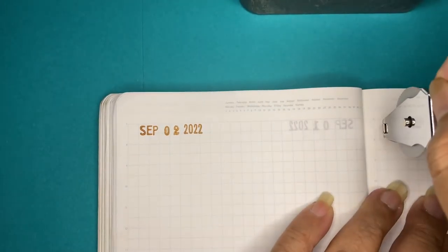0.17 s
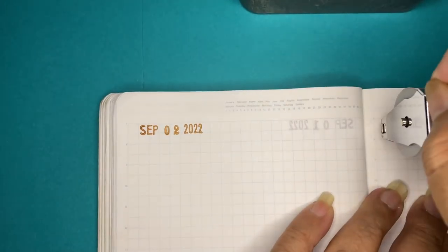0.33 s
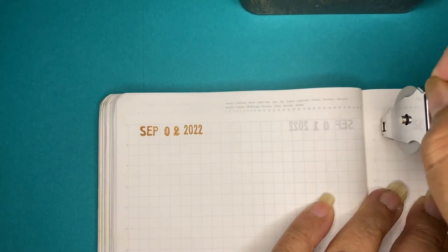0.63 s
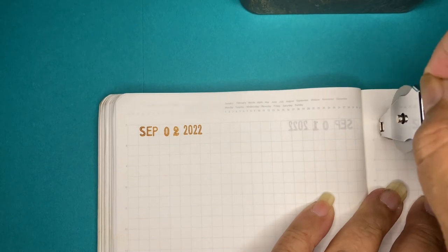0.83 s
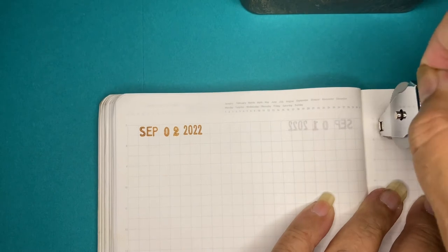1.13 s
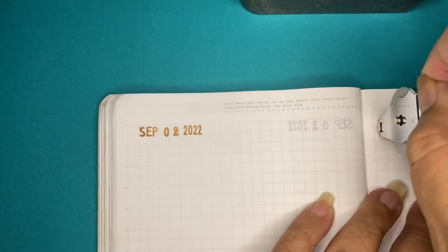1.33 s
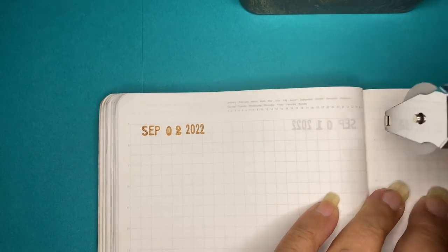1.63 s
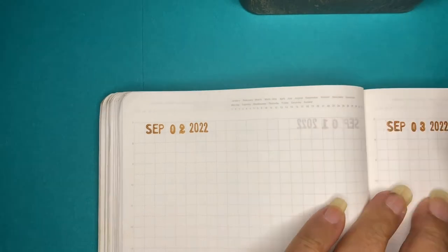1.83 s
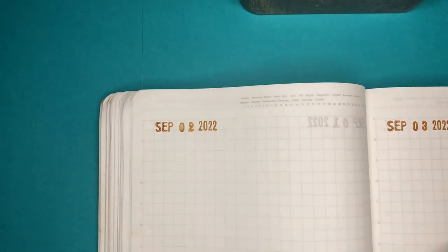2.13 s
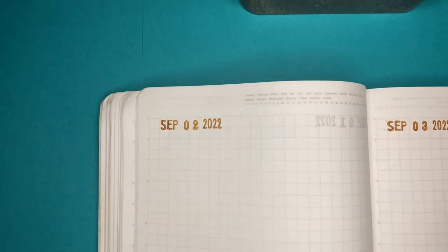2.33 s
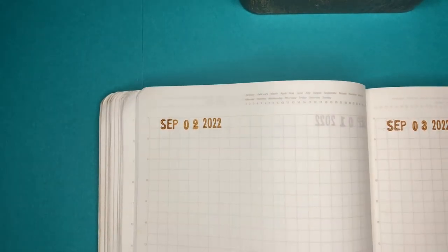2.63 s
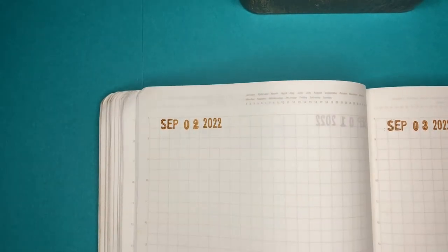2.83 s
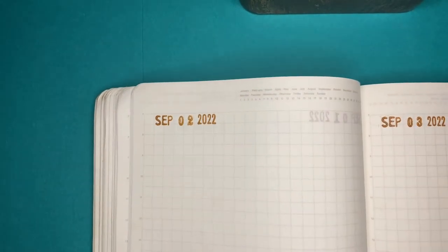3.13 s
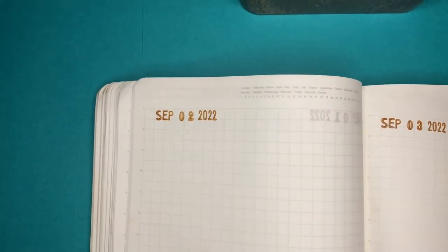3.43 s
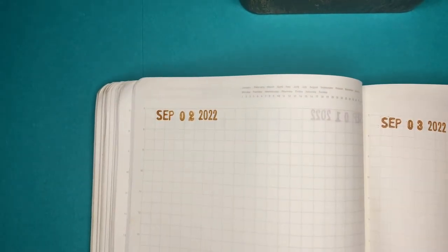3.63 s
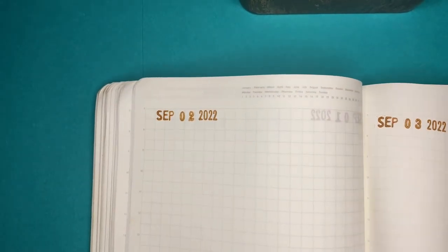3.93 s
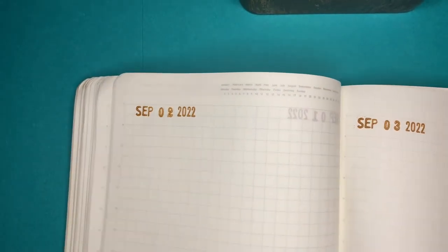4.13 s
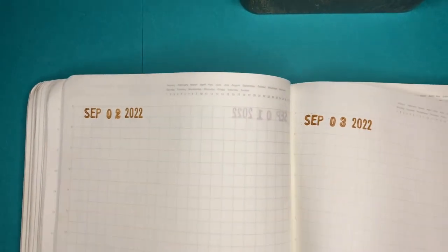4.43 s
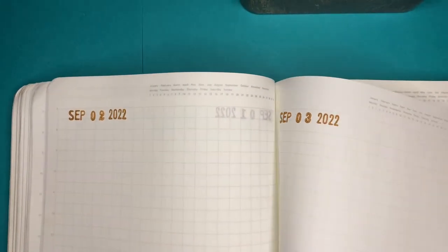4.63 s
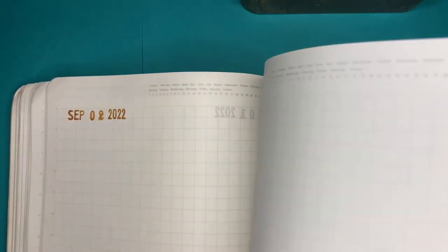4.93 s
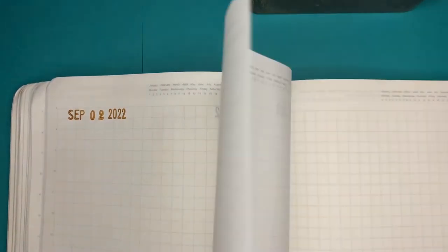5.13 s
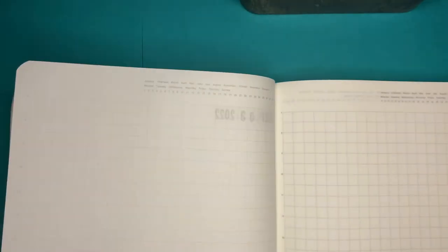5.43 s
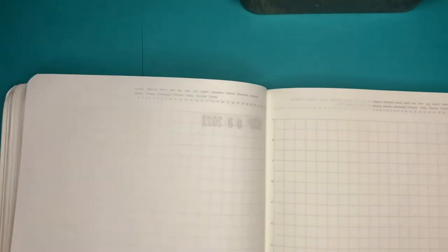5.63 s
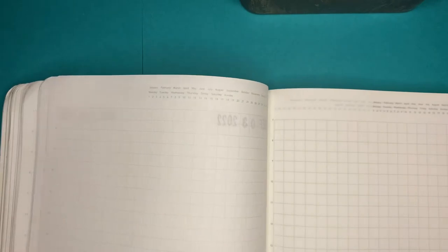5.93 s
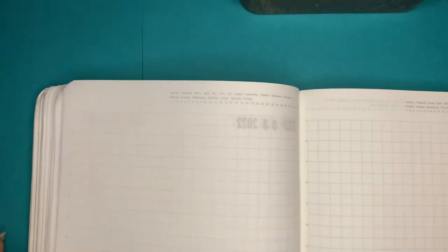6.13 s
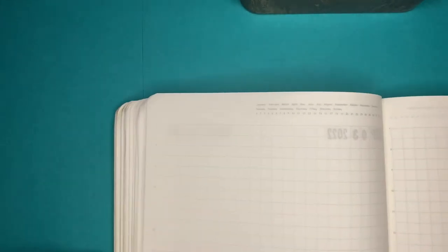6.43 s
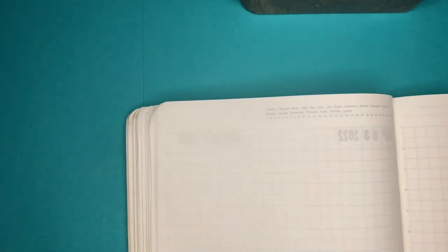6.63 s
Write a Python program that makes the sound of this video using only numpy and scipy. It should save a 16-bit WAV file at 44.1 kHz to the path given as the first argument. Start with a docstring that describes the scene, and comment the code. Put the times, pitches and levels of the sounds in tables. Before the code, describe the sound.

Close above a desk in a quiet room with low ventilation hum, a small metal stamp lifts off paper with light clicks and is put aside with faint tinkles. A soft thump follows, then a finger stutters along paper with crisp crinkles. After gentle brushing, a page snaps free loudly, flaps over and settles, and the book is pushed across a mat with a muted scrape.

```python
"""A quiet room hums; then a metal date stamp is lifted off a notebook and put aside, clicking and tinkling.
A finger slides along the paper in jerks, a page snaps free and flaps over, the book is pushed over the mat.
Contacts are bursts of grit through resonances, friction is shaped noise with gliding rings,
the room is noise, drones and sines. Two closely spaced microphones hang just above the desk."""
import sys
import numpy as np
from scipy import signal
from scipy.fft import rfft, irfft, next_fast_len
from scipy.io import wavfile

SR = 44100
rng = np.random.default_rng(int(sys.argv[2]) if len(sys.argv) > 2 else 0)


def unload_audio(sound):
    """Save the sound as a 16-bit wav file, at the path given as the first command line argument."""
    columns = np.transpose(np.atleast_2d(sound))
    # keep every value between -1 and 1, then stretch to whole-number steps
    steps = np.round(np.clip(columns, -1, 1) * 32767)
    wavfile.write(sys.argv[1], SR, steps.astype(np.int16))


N = 298557
TIME = np.arange(N) / SR
PADDED = next_fast_len(N + SR // 4, True)
FREQ = np.arange(PADDED // 2 + 1) * SR / PADDED
LEFT_RIGHT = np.array([[.5], [-.5]])  # splits a left-minus-right difference over the channels
CREST_S = 1 / 50  # position of the crest within each burst
CUTOFF_HZ = 15900

# bent sheet buckling and fluttering: (time [s], level [dB], decay [s], pitch ratio, belly [dB re sheet gain])
FLAPS = [(4.566, -29, 0.0043, 0.84, -3), (4.572, -37.5, 0.004, 1.02, -3), (4.581, -40.5, 0.0025, 1.08, -1),
         (5.1906, -21.5, 0.0017, 1.05, -12), (5.1934, -23.5, 0.0046, 1, -12), (5.202, -30, .002, 0.87, -1),
         (5.2078, -39, .002, 1.02, -3), (5.2118, -30.5, .0025, 0.99, 2), (5.2194, -21, 0.0011, 0.937, -3),
         (5.2221, -26, 0.003, 1, -6), (5.2292, -32, 0.0046, 0.95, -13), (5.239, -38, 0.0069, .97, 1),
         (5.2685, -34.5, 0.0031, 0.96, -8)]
# ring of the released page: (frequency [Hz], width [Hz], gain [dB])
SNAP_MODES = [(1310, 300, 0.5), (1780, 440, -2.5), (2620, 370, -10), (3040, 160, -14), (3400, 170, -11),
              (4660, 140, -6), (5130, 220, -10.5), (5520, 310, -8), (6270, 340, -7.5), (9440, 690, -15.5),
              (10700, 710, -16.5), (12500, 1300, -21), (15500, 900, -29)]
# sheet resonances at pitch ratio 1: (frequency [Hz], width [Hz], gain [dB])
SHEET_MODES = [(1765, 160, -1.5), (2060, 220, 4.5), (2540, 440, 0), (3750, 430, -9), (4750, 1470, -13.5)]
# page lifted, swung over, slid flat; levels before trim:
# (time [s], ring [dB], resonance [Hz], hiss [dB])
PAGE_SWEEP = [(4.8, -78, 2987, -75), (4.885, -68, 4314, -70), (4.96, -77, 4020, -76),
              (5.06, -63, 3600, -71), (5.115, -65, 3520, -58.5), (5.15, -56.5, 2303, -56),
              (5.185, -54, 2700, -60), (5.218, -42.5, 3907, -72), (5.248, -55, 4400, -76),
              (5.275, -76, 2600, -86), (5.3, -80, 2594, -87), (5.47, -73, 3800, -76),
              (5.55, -71, 4130, -76), (5.625, -56, 4007, -72), (5.68, -76, 4290, -69)]
# finger slipping along the page; level before trim: (time [s], length [s], level [dB])
SLIPS = [(3.253, 0.028, -37), (3.271, 0.032, -40.5), (3.301, 0.024, -43.5), (3.329, 0.0046, -39.5),
         (3.347, 0.0064, -38.5), (3.363, 0.0054, -37.5), (3.372, 0.0095, -40.5), (3.384, 0.025, -40.5),
         (3.412, 0.0088, -40.5), (3.432, 0.0071, -38), (3.459, 0.0077, -42), (3.482, 0.0086, -43),
         (3.5, 0.034, -46.5), (3.534, 0.025, -52.5), (3.583, 0.035, -54), (3.617, 0.0099, -39.5),
         (3.632, 0.015, -49.5)]
# kinks in the paper: (time [s], level [dB], resonance [Hz])
CRINKLES = [(2.6756, -45, 1710), (2.6804, -37.5, 1900), (2.809, -61.5, 4470), (3.261, -31, 4600),
            (3.293, -38, 4400), (3.3007, -32, 3800), (3.4635, -42, 3500), (3.483, -34, 3000),
            (3.4885, -45, 5000), (3.504, -35, 3080), (3.511, -31, 2900), (3.528, -42, 2900),
            (3.5545, -43.5, 4400), (3.616, -35.5, 2593), (3.623, -39, 1906), (3.638, -39, 1600),
            (3.7335, -45.5, 3230), (4.2107, -47, 2800), (4.661, -46.5, 1400), (4.756, -47, 1580),
            (4.8512, -41, 1500), (4.852, -53, 4600), (4.8645, -52, 1700), (4.885, -56, 4500),
            (4.912, -51, 3600), (4.937, -55.5, 3980), (5.037, -55, 3000), (5.143, -45, 2300),
            (5.183, -37, 5230), (5.186, -34, 4800), (5.366, -56, 3900), (5.406, -47.5, 2040),
            (5.534, -49, 2100), (5.58, -48, 1790), (5.6458, -38, 3900), (5.6472, -39, 2950),
            (5.6493, -37, 3970), (5.652, -45, 3700), (5.763, -52, 3230)]
# short-lived high modes that make a paper kink crisp: (frequency [Hz], width [Hz], gain [dB])
KINK_EDGE_MODES = [(6060, 2500, -3), (9900, 4500, 2), (15000, 2700, -4)]
# soft knocks of hand, stamp and page on the book: (time [s], level [dB], resonance [Hz])
KNOCKS = [(2.0175, -42, 610), (2.676, -43, 460), (2.686, -44.5, 380), (3.395, -43, 745), (3.433, -49, 700),
          (3.483, -46, 950), (3.504, -44, 1100), (3.589, -36.5, 640), (4.565, -44, 480), (4.5665, -45, 223),
          (4.851, -49, 800), (5.19, -37.5, 430), (5.204, -38, 320), (5.211, -37, 61.6), (5.2195, -40, 620),
          (5.220, -36, 166), (5.228, -38.5, 150), (5.646, -42, 744)]
# stamp touching paper and desk:
# (time [s], level [dB], resonance [Hz], crisp edge [dB re click], thud [dB re click])
STAMP_CLICKS = [(1.466, -55, 2900, -9, -12), (1.4755, -46, 2200, -22, -10), (1.5503, -41.5, 2350, -8, -9),
                (1.5693, -46, 2500, 1, -4), (1.5711, -48.5, 1200, -12, -4.5), (1.628, -66, 3500, -4, -8),
                (1.7002, -45.5, 2060, -9, -5.5), (1.8035, -52, 2300, -15, -15), (1.8635, -53, 2400, -8, -4),
                (1.9185, -56.5, 1900, 8.5, 0), (1.9365, -48.5, 2200, 3.5, -4),
                (1.9425, -48.5, 2000, -9, -4), (1.976, -62, 3000, 5, -6), (1.993, -48, 2500, 2, -6),
                (2.0182, -48.5, 1400, 10, -5), (2.025, -53, 1900, 3, 0), (2.056, -55, 3500, -2, -6),
                (2.373, -64, 4000, 0, -3), (2.397, -63, 2200, 3, -6), (2.4905, -51, 5530, -12, -3),
                (2.4978, -43, 2460, -6, -4)]
# loose metal rattling in the stamp; level before trim: (time [s], level [dB])
TINKLES = [(2.19, -60), (2.265, -54), (2.446, -49), (2.526, -51), (2.584, -53)]
# stamp modes: (frequency [Hz], width [Hz], gain [dB])
STAMP_MODES = [(1240, 22, -5), (1420, 18, -8), (1712, 22, 3.5), (2280, 30, -5), (2700, 70, -9),
               (3390, 32, -12), (3597, 36, -7), (3680, 32, -6.5), (4128, 36, -9.5), (4310, 28, -8),
               (4700, 38, -12), (5060, 36, -16)]
# short-lived high modes that make a stamp click crisp: (frequency [Hz], width [Hz], gain [dB])
STAMP_EDGE_MODES = [(5640, 1600, 3.5), (9300, 3200, -0.5), (12500, 2200, -0.5), (15400, 2200, -5)]
# paper and hand sliding softly; hiss before trim: (start [s], length [s], rub [dB], hiss [dB])
SLIDES = [(1.46, 0.8, -70, -83), (1.464, 0.016, -61, -75), (1.975, 0.047, -65, -65),
          (2.03, 0.035, -62.5, -76), (2.058, 0.043, -63, -67), (2.444, 0.22, -65, -78),
          (2.639, 0.049, -56.5, -61.5), (2.802, 0.015, -60, -67), (2.976, 0.052, -56.5, -60),
          (3.154, 0.14, -65, -74), (3.338, 0.12, -60.5, -63), (3.538, 0.099, -56.5, -58),
          (3.667, 0.25, -67, -70), (3.73, 0.021, -60.5, -58), (3.817, 0.018, -59.5, -62),
          (3.985, 0.28, -67, -69), (4.072, 0.11, -52, -59.5), (4.298, 0.2, -61.5, -69),
          (4.81, 0.49, -66, -78), (4.849, 0.032, -60, -67), (5.376, 0.041, -57.5, -67.5),
          (5.468, 0.11, -58, -75), (5.618, 0.039, -58.5, -62), (5.692, 0.014, -66, -60),
          (5.854, 0.083, -70, -71)]
# book pushed across the mat; levels before trim: (time [s], rub [dB], hiss [dB])
BOOK_PUSH = [(5.9, -71, -75), (6.014, -55.5, -56), (6.054, -57.5, -69.5), (6.192, -53, -66),
             (6.428, -55, -66.5), (6.482, -65, -81), (6.582, -71, -87), (6.654, -68, -76), (6.76, -79, -99)]
# mains hum and faint motor whine: (frequency [Hz], level before balance [dB])
HUM = [(120, -59.5), (179.3, -63.5), (398.9, -71), (607.2, -73.5), (960.4, -76), (1011.5, -94),
       (1061.8, -74)]
# low room modes stirred by distant machinery: (frequency [Hz], nominal width [Hz], level before balance [dB])
DRONE = [(52.5, 5.1, -56.5), (65.1, 4.6, -56.5), (117.35, 6.6, -59.5), (190.8, 10.7, -66.5)]
# relative spectra of ventilation, finger friction, dull rub, fine hiss: (frequency [Hz], density [dB per Hz])
AIR_SPECTRUM = [(25, -20), (45, -9), (90, -4.5), (190, -4.5), (270, -5), (330, -10.5), (400, -7.5),
                (520, -17), (950, -16), (1500, -23.5), (2400, -24.5), (4000, -34.5), (6000, -45),
                (8500, -51), (15000, -67)]
SWISH_SPECTRUM = [(300, -7), (950, -11), (1600, -18), (2800, -3), (4200, 2), (5300, -3.5), (8000, -3.5),
                  (11500, -5), (13500, -12), (15500, -23)]
RUB_SPECTRUM = [(200, -1), (450, -7.5), (700, 5.5), (1400, 0), (2300, -4), (3500, -7.5), (6000, -11.5),
                (9000, -62)]
HISS_SPECTRUM = [(1500, 0), (4000, 3.5), (6000, 0.5), (8000, 4), (11500, -0.5), (13500, -0.5), (15500, -6)]
# phase difference between the channels: (frequency [Hz], lead of left [rad])
CHANNEL_PHASE = [(0, 0), (1000, .25), (2300, .35), (3600, .35), (4500, .6), (5600, .2), (6500, 1.9),
                 (7000, 2.9), (7500, 3.14), (8300, 3.7), (9700, 6.1), (11400, 6.6), (12100, 7.6),
                 (12900, 9.1), (14200, 9.6), (15300, 11.7), (16500, 13)]
# left-right correlation of the ventilation noise: (frequency [Hz], likeness [-1..1])
AIR_LIKENESS = [(110, 1), (170, .97), (260, .92), (400, 0), (700, 0.4), (1100, -0.1), (1700, 0.9),
                (3000, 0.1), (6000, 1)]
# balance of all room tone: (frequency [Hz], left minus right [dB])
AIR_BALANCE = [(60, 1), (200, -2), (380, -5.5), (700, 1), (1290, 3.5), (2400, -0.5), (8000, 3.5)]

SNAP_S, SNAP_PEAK_DB = 4.5628, -12.5  # peak before panning
BELLY_HZ, BELLY_WIDTH_HZ = 1230, 370  # low resonance of the sheet; frequency at pitch ratio 1
FLAP_RISE_S = 0.0019
# crisp edge of a kink at a typical resonance; higher kinks are crisper
KINK_CYCLES, KINK_HZ, KINK_EDGE_DB, KINK_EDGE_DB_PER_OCTAVE = 3.7, 3270, -9, 18
# decay at a typical resonance, and the power of pitch by which it shortens
KNOCK_DECAY_S, KNOCK_HZ, KNOCK_DAMPING = 0.0067, 540, 0.62
# all stamp touches share one decay in cycles and one thud resonance through the pages
STAMP_CYCLES, THUD_HZ = 3.9, 810
SETTLE_S, SETTLE_HOLD_S, SETTLE_DB = 2.686, 0.016, -41
SETTLE_START_HZ, SETTLE_END_HZ, SETTLE_GLIDE_S = 235, 104, 0.0084
# the whole page rings under the finger, higher while the first grip pulls it taut
PAGE_HZ, GRIP_OCTAVES = 1620, .7
# the free stretch of paper starts here and sinks as it lengthens
FREE_PAPER_HZ, FREE_PAPER_OCTAVES_PER_S = 4440, 2.4
# edge of a slip of typical length; longer slips have softer edges
SLIP_EDGE_S, SLIP_TYPICAL_S = 0.0031, 0.0053
# the first grip adds treble that dies away in GRIP_S; the usual treble falls with travel
GRIP_TREBLE_DB, GRIP_S, SLIP_TREBLE_DB, TREBLE_FALL_DB_PER_S = 10.5, .03, -0.5, 11
RUBBED_SHEET_HZ = 2200
# attack and release of a stroke of typical length; longer strokes are gentler
STROKE_S, STROKE_ATTACK_S, STROKE_RELEASE_S = 0.097, 0.016, 0.026
# between strokes the hands still brush the book, from here to the end; hiss before trim
HANDLING_FROM_S, HANDLING_HISS_DB = 2.4, -82.5
HANDLING_PAN_DB = -0.4  # left minus right: hands slightly to the right


def page_snap(second_s=.00055, second=0.53, ripple_s=0.0014, ripple=0.24):
    """The sheet pops through in two quick steps; the bend bounces back once from its edge."""
    kicks = np.zeros(N)
    for delay_s, strength in [(0, 1), (second_s, second), (ripple_s, ripple)]:
        kicks[round((SNAP_S + delay_s) * SR)] += strength
    pop = body(kicks, SNAP_MODES)
    return from_db(SNAP_PEAK_DB) * pop / np.abs(pop).max()


def page_flaps(top_hz=7800, full_db=-20, dulling=0.57, hard_db=1.5, softening=.8):
    """A buckle is a sharp pop amid tiny kinks, ringing sheet and belly; weak ones are softer and duller."""
    out = np.zeros(N)
    for s, db, decay_s, pitch, belly_db in FLAPS:
        below_full_db = db - full_db
        envelope = swell(FLAP_RISE_S, decay_s)
        pop = strike(envelope, hard_db + softening * below_full_db)
        belly = from_db(belly_db) * resonate(pop, BELLY_HZ * pitch, BELLY_WIDTH_HZ)
        ring = body(pop, SHEET_MODES, pitch) - belly
        dulled = soften(ring, top_hz * from_db(dulling * below_full_db))
        add(out, s, sized(dulled, envelope, db))
    return out


def page_sweep(ring_trim_db=-3, hiss_trim_db=2.0, width_share=0.23, ragged_db=2.0, crackle_db=-2):
    """The turning page drags past its neighbour and the fingers, crackling, its ring pitch set by its bend."""
    s, ring_db, hz, hiss_db = np.transpose(PAGE_SWEEP)
    kinks = pitched_crackle(per_s=130, low_hz=1700, high_hz=5900, width_share=0.14, spread_db=12)
    ring = gliding(grains(spread_db=7.0), np.interp(TIME, s, hz), width_share)
    ring = ring + from_db(crackle_db) * kinks
    ring_gain = from_db(np.interp(TIME, s, ring_db) + ring_trim_db)
    hiss = colour(grains(spread_db=3), HISS_SPECTRUM)
    hiss_gain = from_db(np.interp(TIME, s, hiss_db) + hiss_trim_db)
    ragged = from_db(ragged_db * wander(rate_hz=54))
    return (ring * ring_gain + hiss * hiss_gain) * ragged * (TIME > s[0]) * (TIME < s[-1])


def finger_slips(split_hz=6500, trim_db=-1, crackle_db=-3, free_ring_db=-4, page_ring_db=-6,
                 waver_octaves=.07, kinks_db=-3):
    """Friction sounds while the finger slips, stops while it sticks; the paper rings lower with travel."""
    travel_s = np.clip(TIME - SLIPS[0][0], 0, SLIPS[-1][0] - SLIPS[0][0])
    grip = np.exp(-travel_s / GRIP_S)
    fibres = grains(spread_db=2.5) + from_db(crackle_db) * crackle(per_s=300, spread_db=5)
    friction = colour(fibres, SWISH_SPECTRUM)
    treble = filtered(friction, 1 - 1 / (1 + (FREQ / split_hz) ** 8))
    treble_db = SLIP_TREBLE_DB + GRIP_TREBLE_DB * grip - TREBLE_FALL_DB_PER_S * travel_s
    swish = friction - treble + from_db(treble_db) * treble

    free_octaves = waver_octaves * wander(rate_hz=44.1) - FREE_PAPER_OCTAVES_PER_S * travel_s
    page_octaves = waver_octaves * wander(rate_hz=43) + GRIP_OCTAVES * grip
    free_ring = gliding(grains(spread_db=3.0), FREE_PAPER_HZ * 2 ** free_octaves, width_share=.14)
    page_ring = gliding(grains(spread_db=3.5), PAGE_HZ * 2 ** page_octaves, width_share=0.35)
    rings = from_db(free_ring_db) * free_ring + from_db(page_ring_db) * page_ring
    kinks = pitched_crackle(per_s=1100, low_hz=1500, high_hz=6500, width_share=.035, spread_db=6)

    gain = np.zeros(N)
    for s, length_s, db in SLIPS:
        edge_s = SLIP_EDGE_S * np.sqrt(length_s / SLIP_TYPICAL_S)
        corners_s = [s - 2 * edge_s, s + edge_s,
                     s + max(length_s - edge_s, edge_s), s + length_s + 2 * edge_s]
        gate = np.interp(TIME, corners_s, [0, 1, 1, 0]) ** 2
        gain = np.maximum(gain, gate * from_db(db))
    return gain * from_db(trim_db) * (swish + rings + from_db(kinks_db) * kinks)


def crinkles():
    """Kinks pop through the sheet, crisper the higher they ring."""
    kinks = []
    for s, db, hz in CRINKLES:
        edge_db = KINK_EDGE_DB + KINK_EDGE_DB_PER_OCTAVE * np.log2(hz / KINK_HZ)
        kinks.append((s, db, hz, edge_db))
    return clicks(kinks, 0.00047, KINK_CYCLES, width_share=0.4, edge_modes=KINK_EDGE_MODES, hard_db=0.5)


def knocks(rows, rise_s=0.00042, width_share=.95, hard_db=0):
    """Dull, heavily damped blows through the stack of pages; low ones last longer."""
    out = np.zeros(N)
    for s, db, hz in rows:
        envelope = swell(rise_s, KNOCK_DECAY_S * (KNOCK_HZ / hz) ** KNOCK_DAMPING)
        push = strike(envelope, hard_db)
        thud = resonate(resonate(push, hz, width_share * hz), hz, width_share * hz)
        add(out, s, sized(thud, envelope, db))
    return out


def book_settles(rise_s=0.0029, decay_s=0.0065):
    """Let go, the stack of pages sags with a soft thump whose pitch falls."""
    t = TIME - SETTLE_S
    fall = np.exp(-np.maximum(t, 0) / SETTLE_GLIDE_S)
    hz = SETTLE_END_HZ + (SETTLE_START_HZ - SETTLE_END_HZ) * fall
    envelope = np.exp(np.minimum(np.minimum(t / rise_s, (SETTLE_HOLD_S - t) / decay_s), 0))
    return from_db(SETTLE_DB) * envelope * np.sin(2 * np.pi * (np.cumsum(hz) / SR + rng.random()))


def stamp(ring_db=-7):
    """Each touch of the metal is a click with a faint ring and a small thud under it."""
    touches = [(s, db, hz, edge_db) for s, db, hz, edge_db, _ in STAMP_CLICKS]
    thuds = [(s, db + thud_db, THUD_HZ) for s, db, _, _, thud_db in STAMP_CLICKS]
    ticks = clicks(touches, 0.00053, STAMP_CYCLES, width_share=0.43, edge_modes=STAMP_EDGE_MODES, hard_db=2)
    return ticks + from_db(ring_db) * body(ticks, STAMP_MODES) + knocks(thuds)


def tinkles(rise_s=.0013, rattle_s=0.014, grit_db=-5.5, trim_db=3.5, jolt=19, uneven_db=1.0):
    """Each jolt rings the stamp's modes in its own mix and sets a loose part chattering briefly."""
    out = np.zeros(N)
    for s, db in TINKLES:
        envelope = swell(rise_s, rattle_s)
        chatter = envelope * grains(spread_db=6, size=len(envelope))
        blow = signal.unit_impulse(len(envelope), np.argmax(envelope))
        modes = [(hz, width_hz, mode_db + uneven_db * rng.standard_normal())
                 for hz, width_hz, mode_db in STAMP_MODES]
        ring = rms_one(body(chatter + jolt * blow, modes))
        grit = rms_one(resonate(resonate(chatter, hz=2800, width_hz=1600), hz=3180, width_hz=1900))
        add(out, s, sized(ring + from_db(grit_db) * grit, envelope, db + trim_db))
    return out


def slides(hiss_trim_db=3, fade_s=0.07):
    """Each stroke over the paper swells, holds and dies away, above a faint brushing of the hands."""
    handling = np.interp(TIME, [HANDLING_FROM_S - fade_s, HANDLING_FROM_S], [0, 1])
    rub_gain = np.zeros(N)
    hiss_gain = handling * from_db(HANDLING_HISS_DB + hiss_trim_db)
    for s, length_s, rub_db, hiss_db in SLIDES:
        gentle = np.sqrt(length_s / STROKE_S)
        attack = (TIME - s) / STROKE_ATTACK_S
        release = (s + length_s - TIME) / STROKE_RELEASE_S
        stroke = np.exp(np.minimum(np.minimum(attack, release), 0) / gentle)
        rub_gain = np.maximum(rub_gain, stroke * from_db(rub_db))
        hiss_gain = np.maximum(hiss_gain, stroke * from_db(hiss_db + hiss_trim_db))
    return sliding(rub_gain, hiss_gain)


def book_push(rub_trim_db=-0.5, hiss_trim_db=2.5, fade_s=0.025):
    """The whole book slides over the mat in one long push."""
    s, rub_db, hiss_db = np.transpose(BOOK_PUSH)
    fade = np.interp(TIME, [s[0] - fade_s, s[0]], [0, 1])
    rub_gain = from_db(np.interp(TIME, s, rub_db) + rub_trim_db)
    hiss_gain = from_db(np.interp(TIME, s, hiss_db) + hiss_trim_db)
    return fade * sliding(rub_gain, hiss_gain)


def sliding(rub_gain, hiss_gain, crackle_db=-5, ragged_db=1.45, ring_db=-8, waver_octaves=0.11):
    """Broad contact gives a dull rub and a wavering sheet ring, the paper's edge a fine crackling hiss."""
    rub_fibres = grains(spread_db=4) + from_db(crackle_db) * crackle(per_s=120, spread_db=10.5)
    rub = colour(rub_fibres, RUB_SPECTRUM)
    ring_hz = RUBBED_SHEET_HZ * 2 ** (waver_octaves * wander(rate_hz=11))
    ring = gliding(grains(spread_db=3.5), ring_hz, width_share=0.12)
    hiss_fibres = grains(spread_db=1.5) + from_db(crackle_db) * crackle(per_s=220, spread_db=10)
    hiss = colour(hiss_fibres, HISS_SPECTRUM)
    ragged = from_db(ragged_db * wander(rate_hz=27))
    return ((rub + from_db(ring_db) * ring) * rub_gain + hiss * hiss_gain) * ragged


def reflections(x, wet_db, t60_s, first_s, top_hz):
    """A short decaying scatter of echoes, different at each microphone."""
    t = TIME[:SR // 4]
    scatter = rng.standard_normal((2, len(t))) * (t > first_s) * np.exp(-np.log(1000) * t / t60_s)
    echoes = from_db(wet_db) * rms_one(soften(scatter, top_hz)) / np.sqrt(len(t))
    return signal.fftconvolve(x[None], echoes, axes=1)[:, :N]


def room_tone(air_db=-52):
    """Ventilation noise from all sides, droning room modes and steady hum."""
    alike = np.clip(over_hz(AIR_LIKENESS), -1, 1)
    mid = filtered(rng.standard_normal(N), np.sqrt(1 + alike))
    side = filtered(rng.standard_normal(N), np.sqrt(1 - alike))
    air = from_db(air_db) * colour(np.array([mid + side, mid - side]), AIR_SPECTRUM)
    drone, hum = np.zeros(N), np.zeros(N)
    for hz, width_hz, db in DRONE:
        noise = rng.standard_normal(N + SR)
        mode = resonate(resonate(noise, hz, 2 * width_hz), hz, 2 * width_hz)
        drone += from_db(db) * rms_one(mode[SR:])  # skip the build-up
    for hz, db in HUM:
        hum += from_db(db) * np.sqrt(2) * np.sin(2 * np.pi * (hz * TIME + rng.random()))
    return filtered(air + drone + hum, from_db(over_hz(AIR_BALANCE) * LEFT_RIGHT))


def clicks(rows, rise_s, cycles, width_share, edge_modes, hard_db):
    """Brief gritty contacts: one broad resonance and a crisp edge above it."""
    out = np.zeros(N)
    for s, db, hz, edge_db in rows:
        envelope = swell(rise_s, cycles / hz)
        grit = strike(envelope, hard_db)
        ring = resonate(resonate(grit, hz, width_share * hz), hz, 2 * width_share * hz)
        edge = body(np.gradient(grit), edge_modes)
        add(out, s, sized(ring, envelope, db) - sized(edge, envelope, db + edge_db))
    return out


def strike(envelope, hard_db):
    """One hard blow at the crest, hard_db above the grit that surrounds it."""
    grit = rms_one(envelope * rng.standard_normal(len(envelope)))
    blow = rms_one(signal.unit_impulse(len(envelope), np.argmax(envelope)))
    return grit + from_db(hard_db) * blow


def grains(spread_db, size=N):
    """Fibres catching one another: dense clicks of uneven size; rms 1."""
    return rms_one(rng.standard_normal(size) * from_db(spread_db * rng.standard_normal(size)))


def crackle(per_s, spread_db):
    """Lone fibres let go at random moments; rms 1."""
    moments = rng.random(N) < per_s / SR
    return rms_one(moments * rng.choice([-1, 1], N) * from_db(spread_db * rng.random(N)))


def pitched_crackle(per_s, low_hz, high_hz, width_share, spread_db, count=18):
    """Tiny kinks at random moments, each ringing a patch of paper with its own pitch; rms 1."""
    kinks, patch = crackle(per_s, spread_db), rng.integers(0, count, N)
    out = np.zeros(N)
    for k, hz in enumerate(np.geomspace(low_hz, high_hz, count)):
        out += resonate(kinks * (patch == k), hz, width_share * hz) / np.sqrt(hz)
    return rms_one(out)


def gliding(x, hz, width_share):
    """Steady friction through a resonance, time-warped so its pitch follows the curve hz; rms 1."""
    centre = np.mean(hz)
    ring = resonate(resonate(x, centre, width_share * centre), centre, 2 * width_share * centre)
    return rms_one(np.interp(np.cumsum(hz / centre) % N, np.arange(N), ring))


def wander(rate_hz):
    """Slow random curve; rms 1."""
    return rms_one(filtered(rng.standard_normal(N), np.exp(-(FREQ / rate_hz) ** 2)))


def resonate(x, hz, width_hz):
    """One two-pole resonance with gain 1 on top."""
    r = np.exp(-np.pi * width_hz / SR)
    feedback = [1, -2 * r * np.cos(2 * np.pi * hz / SR), r * r]
    return signal.lfilter(np.array([1, 0, -1]) * (1 - r * r) / 2, feedback, x + 1e-18)


def body(x, modes, pitch=1):
    """Resonances in parallel, signs alternating."""
    return sum((-1) ** k * from_db(db) * resonate(x, hz * pitch, width_hz)
               for k, (hz, width_hz, db) in enumerate(modes))


def soften(x, top_hz):
    """Second-order lowpass: the highest frequencies are damped."""
    return signal.sosfilt(signal.butter(2, min(top_hz, SR / 3), fs=SR, output="sos"), x)


def colour(x, spectrum):
    """Give noise a spectrum that falls away beyond its ends; rms 1."""
    low_end = np.minimum(FREQ / spectrum[0][0], 1) ** 2
    high_end = np.minimum(spectrum[-1][0] / (FREQ + 1), 1) ** 4
    return rms_one(filtered(x, from_db(over_hz(spectrum)) * low_end * high_end))


def filtered(x, response):
    """Apply a frequency response."""
    return irfft(rfft(x, PADDED) * response, PADDED)[..., :N]


def over_hz(points):
    """A table joined on a log-frequency axis."""
    hz, value = np.transpose(points)
    return np.interp(np.log(FREQ + 1), np.log(hz), value)


def swell(rise_s, decay_s):
    """A short exponential rise and decay about the crest."""
    t = np.arange(SR // 5) / SR - CREST_S
    return np.exp(np.minimum(t / rise_s, -t / decay_s))


def sized(x, envelope, db):
    """Scale a burst so that its power at the crest is nominally db."""
    return from_db(db) * rms_one(x) * np.sqrt(np.mean(envelope ** 2))


def add(track, s, burst):
    """Lay a burst into a track with its crest at s."""
    start = round((s - CREST_S) * SR)
    track[start:start + len(burst)] += burst[:N - start]


def from_db(db):
    """Decibels to gain."""
    return 10 ** (np.asarray(db) / 20)


def rms_one(x):
    """Scale to unit power."""
    return x / np.sqrt(np.mean(x ** 2) + 1e-20)


def placed(x, pan_db, lead_s):
    """Level and time difference between the microphones; positive is louder and earlier at the left."""
    return filtered(x, from_db(pan_db * LEFT_RIGHT) * np.exp(2j * np.pi * FREQ * lead_s * LEFT_RIGHT))


def scene():
    """Finger, snap and other handling lie at slightly different places in the humming room."""
    snap, finger = page_snap(), finger_slips()
    page = page_flaps() + page_sweep() + crinkles()
    book = knocks(KNOCKS) + book_settles() + slides() + book_push()
    handling = page + book + stamp() + tinkles()
    direct = placed(finger, pan_db=-1.0, lead_s=-1e-7) + placed(snap, pan_db=1.5, lead_s=8e-6)
    direct = direct + handling * from_db(HANDLING_PAN_DB * LEFT_RIGHT)
    desk = finger + snap + handling
    # hands, book and desk top scatter the sound first, then the furniture
    near = reflections(desk, wet_db=-14, t60_s=.018, first_s=.0005, top_hz=14000)
    room = reflections(desk, wet_db=-20.0, t60_s=0.087, first_s=0.0069, top_hz=3800)
    return direct + near + room + room_tone()


def record(dry):
    """The right channel lags the left in phase, most in the treble; the top is cut."""
    lag_rad = np.interp(FREQ, *np.transpose(CHANNEL_PHASE))
    pair = np.array([dry[0], filtered(dry[1], np.exp(-1j * lag_rad))])
    return signal.sosfilt(signal.ellip(10, .2, 80, CUTOFF_HZ, fs=SR, output="sos"), pair)


dry = scene()
out = record(dry)
unload_audio(out)
```